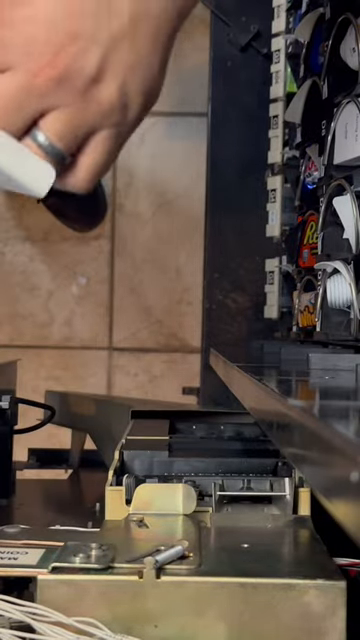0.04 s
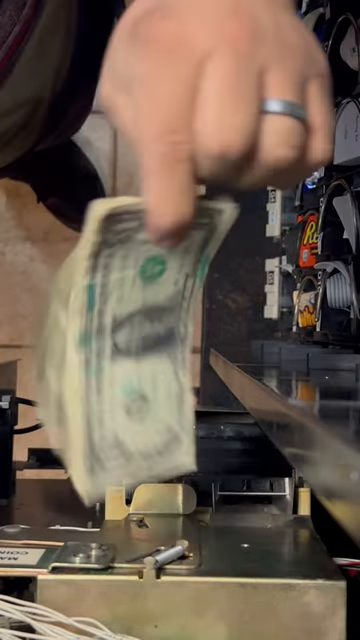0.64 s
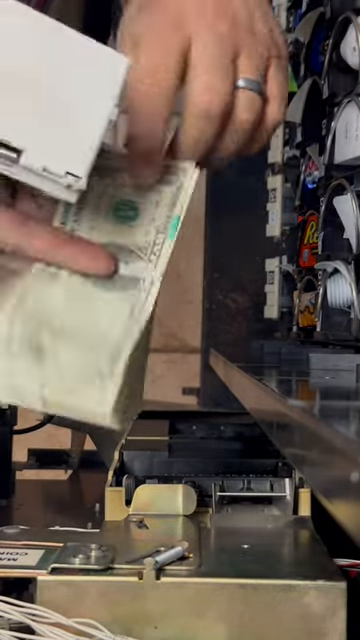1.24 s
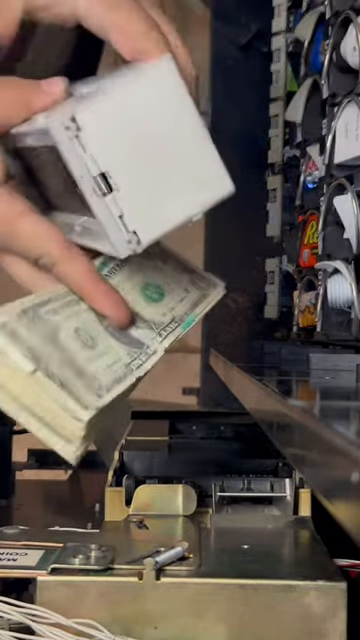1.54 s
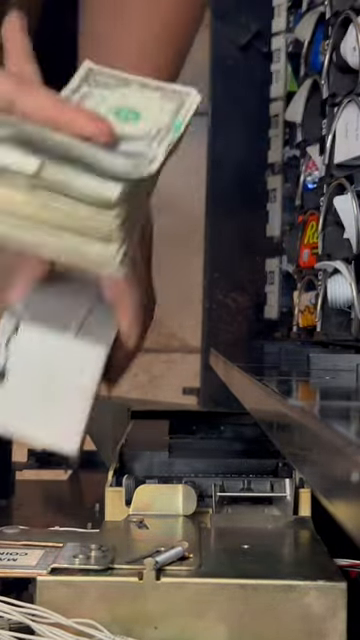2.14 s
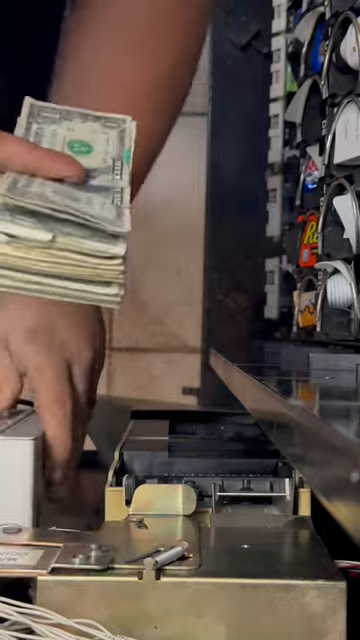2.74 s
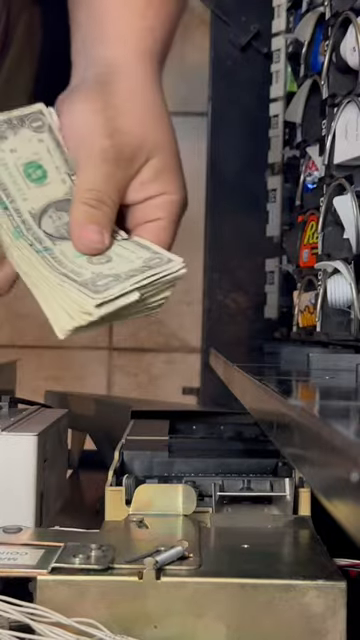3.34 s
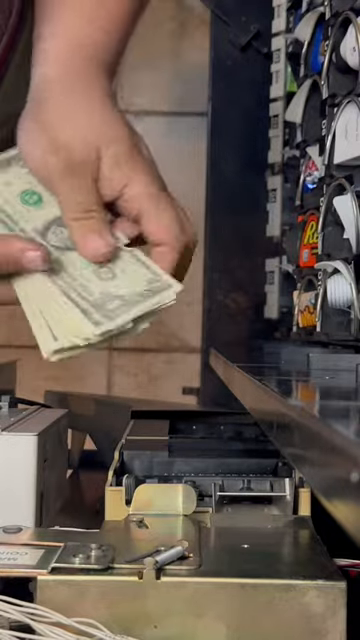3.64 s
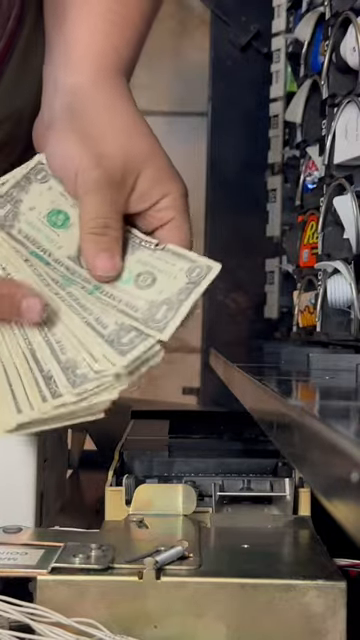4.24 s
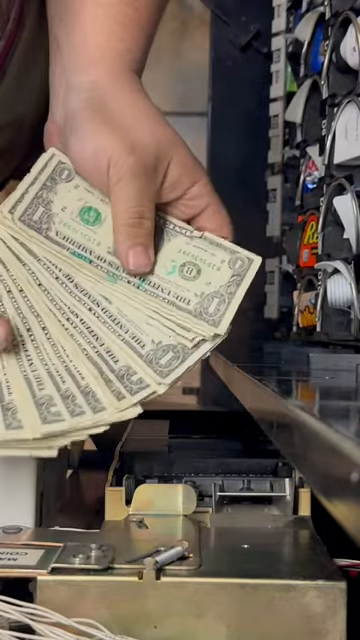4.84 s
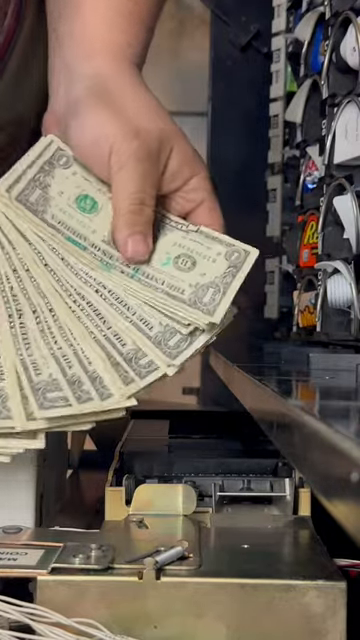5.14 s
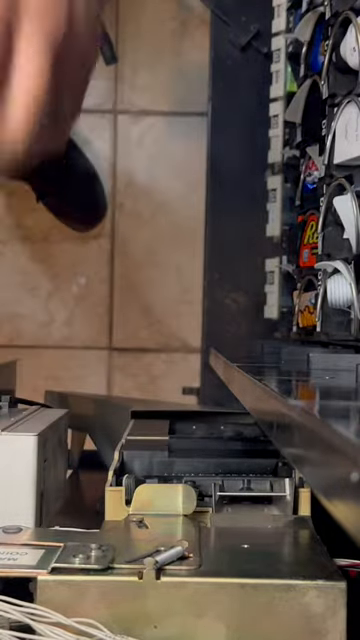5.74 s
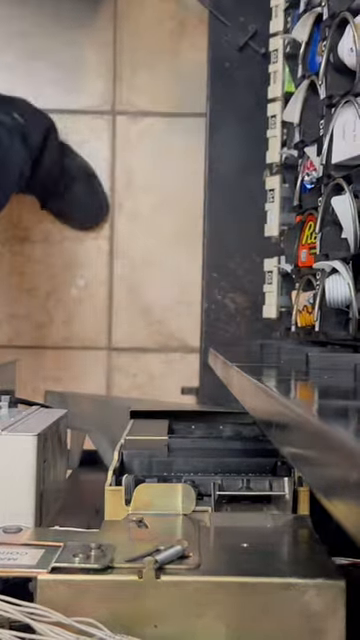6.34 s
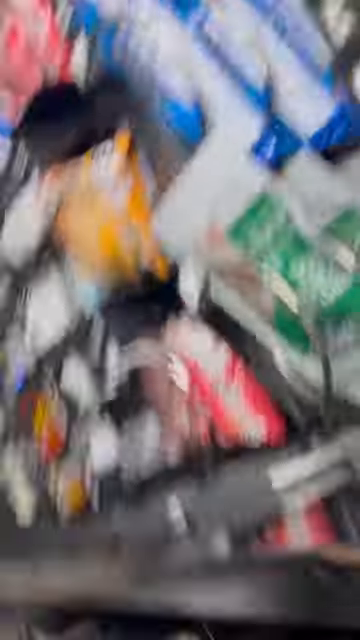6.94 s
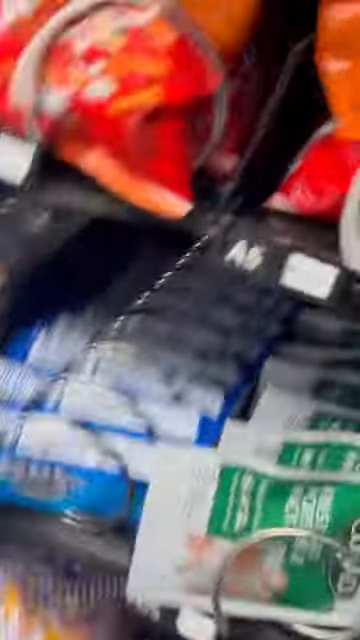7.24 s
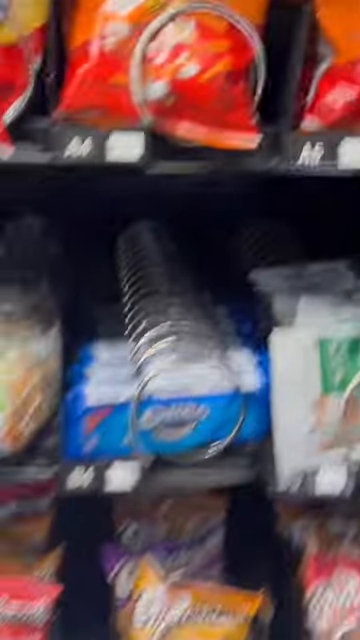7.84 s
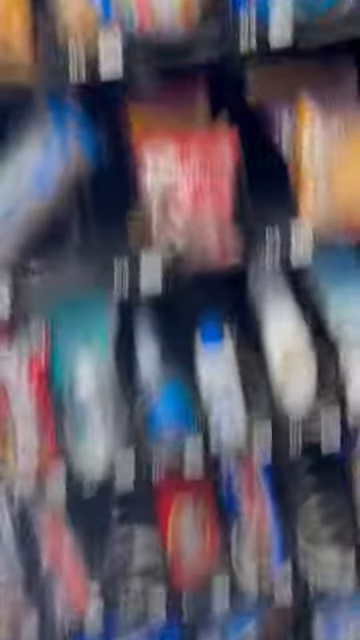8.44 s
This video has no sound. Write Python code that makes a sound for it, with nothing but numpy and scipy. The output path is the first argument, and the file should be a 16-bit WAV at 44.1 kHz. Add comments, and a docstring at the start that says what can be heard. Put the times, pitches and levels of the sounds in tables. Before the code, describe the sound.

Sharp plastic snaps open a cash box close to the microphone, followed by a faint rustle of bills and a few light taps. The box scrapes and clunks into place inside a steel door, leaving a low ring. Bills fan out softly and close with a swish. A shoe scuffs, cloth brushes by, and the door swings with a rumbling, scratchy grind that ends in short scrapes. A vending machine hums throughout in the small room.

```python
"""A vending machine hums in a small tiled room. A plastic cash box squeaks and snaps open, and bills
rub and crackle as they are drawn out. The lid is tapped shut, then the box slides and bumps inside the
steel door, which rings on. The bills are fanned and close with a swish. A footstep thumps and scuffs,
cloth brushes past, and the heavy door swings: its panel rumbles while its edge grinds and scratches,
with a few sharp ticks. Last, the door slows in a stutter of short scrapes and comes to rest."""
import sys
import numpy as np
from scipy import signal
from scipy.fft import rfft, irfft, next_fast_len
from scipy.io import wavfile
from scipy.ndimage import uniform_filter1d, map_coordinates

SR = 44100
rng = np.random.default_rng(int(sys.argv[2]) if len(sys.argv) > 2 else 0)


def generate_wav(signal):
    """Clip the signal to [-1, 1] and save it as 16-bit WAV at the path in sys.argv[1]."""
    frames = np.transpose(np.atleast_2d(signal))
    scaled = np.clip(frames, -1, 1) * 32767
    pcm = np.round(scaled).astype(np.int16)
    wavfile.write(sys.argv[1], SR, pcm)


N = 383664
RIGHT_DELAY_S = 19 / SR
LOW_CUT_HZ, HIGH_CUT_HZ = 45, 15900

# Levels are set before any later gain. A fade_s is the time to fall by 60 dB.
# A TONE table says how strong a sound is from low to high pitch.

# the compressor's hum: pitch_hz, level_db, waver_share
HUM_NOTES = [(51.7, -58.5, 0.78), (122.7, -68, 0.43), (259.7, -62, 0.2), (356.6, -69, 0.4), (1460, -73, .4)]
# air rushing from the cooling fan: pitch_hz, level_db
AIR_TONE = [(25, -29), (55, 2), (85, -5), (140, -10.5), (250, -9), (330, -16.5), (490, -3), (660, -20),
            (850, -16.5), (1700, -30), (2200, -31), (3700, -39), (7000, -43.5), (10500, -35), (15500, -41)]

# hits: start_s, level_db, bass_db, treble_db, contact_s, favoured_pitch_hz, boost_db
LID_SNAPS = [(.055, -42.5, 4, -19.5, 0.0035, 1650, 9), (.080, -35, -13.5, -16, 0.008, 830, 15),
             (.180, -29, -4, -3.5, 0.002, 730, 12.5), (.2255, -31, -0.5, -11, 0.0022, 474, 7),
             (.243, -27, -16, 9, 0.0081, 3350, 12), (.3092, -14.5, 0.5, 11.5, 0.00085, 740, 13),
             (.3222, -19, -5.5, -0.5, 0.0032, 2900, 2.5), (.3563, -11, 1.5, 3.5, 0.0019, 2220, 3)]  # the lid's catch snaps
BOX_TAPS = [(1.775, -26.5, 7, 4, 0.0018, 1470, 5.3), (1.894, -36.5, 10, -8, 0.0025, 600, 4.5),
            (1.980, -37.5, 4.5, -3, 0.0015, 590, 15), (2.423, -31.5, 2, 17, 0.0014, 1130, 13),
            (3.059, -41.5, 5, -3, 0.0057, 694, 2.9), (3.156, -41.5, -5, 4, 0.0027, 740, 14),
            (3.266, -43, 14, -20, 0.0078, 710, 3.5), (3.357, -39, 20, -10, 0.0089, 3300, 9.1)]  # light taps as the box is handled and rocks
DOOR_KNOCKS = [(2.478, -30, -23, -7, 0.004, 800, 3.4), (2.4902, -15.5, 0, -5.5, 0.0023, 1460, 10),
               (2.4966, -15, 4.5, -7.5, 0.0037, 773, 9.9), (2.515, -26, -12, -4, 0.0057, 1500, 3.2),
               (2.608, -34, -13, -5, 0.0023, 1900, 4), (2.6628, -13, 13, -12, 0.0034, 880, 10.5),
               (2.668, -13, 12.5, -4.5, 0.0016, 1090, 9.5), (2.8407, -11.5, 9.5, -8, 0.0023, 1180, 3.6),
               (2.855, -18.5, 13, -7, 0.0033, 1320, 3.1)]  # the box bumps the door
# the notes each thing rings with when hit: pitch_hz, level_db, fade_s
LID_NOTES = [(429, -6, 0.14), (495, 3, 0.0524), (846, -5.5, 0.08), (1357, -2, 0.1376), (1760, -11, 0.0793),
             (2170, -7, 0.11), (2706, -8, 0.034), (3020, -3, 0.038), (3350, -3, 0.08), (4000, -6.5, 0.083),
             (8520, -16, 0.0504)]
BOX_NOTES = [(454, -3, 0.33), (608, -1.5, 0.047), (807, 3.5, 0.04), (1394, 0, 0.047), (1540, -9, 0.065),
             (1900, -6, 0.11), (2990, -8, 0.022)]
DOOR_NOTES = [(349, -4.5, 0.28), (470, -1.5, 0.46), (633, -4, 0.13), (794, 7, 0.05), (868, 7.5, 0.047),
              (1085, 5, 0.034), (1180, 6, 0.06), (1338, 6, 0.06), (1600, -11, 0.13), (2180, -4.5, 0.1),
              (2460, -1, 0.1), (3316, -5, 0.078)]
# the crack of their many crowded higher notes: pitch_hz, level_db
LID_CRACK_TONE = [(60, -22), (200, -0.5), (450, 6.5), (1000, 4.5), (2700, 0), (5000, -7), (9500, -8),
                  (11500, -10.5), (15500, -8.5)]
BOX_CRACK_TONE = [(60, -61), (300, 1), (600, 18), (1100, 17), (1600, 20), (3700, -0.5), (6500, -4),
                  (9500, -33), (15500, -33)]
DOOR_CRACK_TONE = [(60, -26), (230, -26.5), (400, 0.5), (1300, 2), (2500, -5.5), (4000, -4.5), (9500, -5.5),
                   (11500, -9), (15500, -10.5)]

# the lid slides ever harder against its catch, then comes free: time_s, level_db
LID_SLIDE_CURVE = [(.06, -55.5), (.22, -39), (.4, -37.5), (.48, -54)]
# plastic sliding, bright at the lid and hollow along the door: pitch_hz, level_db
LID_SLIDE_TONE = [(150, -11), (400, -3), (600, 15.5), (880, 7.5), (1150, -12), (2500, -0.5),
                  (4000, -5.5), (10000, -5.5), (15500, -14)]
BOX_SLIDE_TONE = [(120, 2), (195, 9.5), (260, -10), (380, 4), (700, 0.5), (1200, -8), (2500, -18),
                  (5000, -27), (10000, -33), (15500, -50)]
# the plastic squeaks as the lid is worked loose: start_s, length_s, level_db, pitch_hz
LID_SQUEAKS = [(0.07, 0.022, -48, 3400), (.14, 0.028, -34, 540), (0.184, 0.022, -39.5, 880),
               (0.223, 0.035, -36, 3400)]
# dull thumps of the box, the door panel and a footstep: start_s, peak_db, pitch_hz, fade_s
DULL_THUMPS = [(0.228, -21.5, 467, 0.087), (0.357, -23, 445, 0.015), (2.495, -16, 763, 0.058),
               (2.525, -21, 127, 0.15), (2.553, -17, 139, 0.11), (2.62, -23, 158, 0.076),
               (2.667, -23, 401, 0.25), (2.844, -19.5, 342, 0.058), (6.407, -31, 54, 0.11),
               (6.439, -34, 72, 0.062), (7.332, -22, 130, 0.033), (7.332, -19, 294, 0.047)]

# rubbing strokes: start_s, length_s, level_db
BILL_STROKES = [(.48, 0.48, -56), (.85, 0.24, -55), (1.2, 0.029, -53), (1.5, 0.4, -61.5), (3.15, 0.17, -58),
                (3.47, 0.26, -53.5), (3.76, 0.58, -64), (5.25, 0.25, -61), (5.55, 1, -57.5)]  # bills are drawn out, squared and gathered
BOX_STROKES = [(2.42, 0.37, -33), (2.83, 0.049, -31.5)]  # the box is pushed along the door
THUMB_STROKES = [(3.5, 0.36, -66), (4.6, 0.57, -69)]  # a thumb fans the bills
SWISH_STROKES = [(5.21, 0.16, -52.5), (6.6, 0.43, -39), (8.26, 0.32, -50)]  # the bills close up, cloth brushes past
SHOE_STROKES = [(6.39, 0.047, -44.5)]  # a sole on the tiles
SETTLING_STROKES = [(7.94, 0.056, -46.5), (8.085, 0.02, -44.5), (8.215, 0.035, -54)]  # the door comes to rest
# notes that rubbing keeps ringing: pitch_hz, width_hz, level_db
LID_RUB_NOTES = [(534, 42, -5), (824, 62, -2), (1860, 140, -7), (2300, 45, -16), (4360, 140, -13)]
PAPER_RUB_NOTES = [(1540, 210, -2), (2016, 89, -2), (2440, 89, -4.5)]
SHOE_RUB_NOTES = [(4700, 4500, 0)]
EDGE_SCRATCH_NOTES = [(2720, 690, -4), (4670, 910, -3), (7300, 2500, -6.5)]
EDGE_RUB_NOTES = [(1620, 430, 10), (2440, 370, -13)]

# small clicks: start_s, level_db, pitch_hz, ring_against_click_db, fade_s
CREASE_POPS = [(.92, -49.5, 3600, -12, 0.1), (.978, -55, 4000, -14, .06), (1.018, -52.5, 3200, 1, .04),
               (1.036, -55, 5500, -3, 0.034), (1.062, -57, 4800, -5, 0.027), (1.249, -55.5, 4300, -8, .04),
               (3.85, -54.5, 2890, -5, 0.13)]  # creases pop as the bills bend
SMALL_TICKS = [(2.366, -47.5, 890, -4, 0.094), (5.684, -54, 2570, 2, 0.06), (5.728, -50, 4000, -26, 0.24),
               (5.876, -51.5, 2390, 3, 0.18), (5.97, -55, 12100, -8, 0.033), (6.206, -47, 706, 9, 0.14),
               (6.581, -35, 4800, -1, 0.087), (7.1456, -33, 4400, 17, 0.18), (7.311, -35, 4520, 10, 0.054),
               (8.157, -37.5, 4350, -9, 0.02), (8.1932, -36, 2300, -11, 0.011),
               (8.268, -44, 1300, 1, 0.013)]  # small sharp ticks and a light footstep
EDGE_CATCHES = [(6.888, -35, 900, 11, .1), (7.056, -29, 740, -18, 0.2), (7.213, -36, 1150, 4, .06),
                (7.245, -31, 525, 0, 0.12), (7.275, -29, 700, -5, 0.11), (7.323, -29, 486, 15, 0.14),
                (7.335, -31, 1150, 2, 0.095)]  # the door's edge catches on rough spots
# the tone of those three kinds of click: pitch_hz, level_db
POP_TONE = [(300, -6), (2000, 11), (6000, 8), (10000, 6), (15000, -12)]
TICK_TONE = [(300, 25), (2000, 14.5), (7000, 13), (10000, 10), (15000, -34)]
CATCH_TONE = [(120, -4), (300, 1), (700, 4), (1400, 1), (2500, -10), (5000, -28), (10000, -28),
              (15000, -45)]
# sliding paper, fine crackle and brushing cloth: pitch_hz, level_db
PAPER_TONE = [(300, 18.5), (900, 13.5), (1600, 8), (2300, 7.5), (4000, -2), (7000, -1.5), (9300, -0.5),
              (15500, -6)]
CRACKLE_TONE = [(300, -3), (1500, 13), (5000, 7), (10000, -3), (15500, -34)]
CLOTH_TONE = [(500, -10), (2000, 1), (5000, 1.5), (8000, 3), (10000, 5), (12000, -3), (15500, -8)]

# how hard the swinging door shakes, drags and hisses: time_s, level_db
SHAKE_CURVE = [(6.52, -56), (6.61, -46), (7.11, -43), (7.41, -25.5), (7.68, -35.5), (8.21, -34.5),
               (8.27, -44.5), (8.5, -44), (8.7, -58.5)]
DRAG_CURVE = [(6.5, -54.5), (6.58, -42.5), (6.74, -35.5), (7.19, -31.5), (7.27, -25), (7.36, -25.5),
              (7.51, -34), (8.05, -43), (8.7, -50)]
HISS_CURVE = [(6.5, -51.5), (6.65, -43), (6.9, -38), (7.13, -40), (7.32, -31.5), (7.43, -38.5),
              (7.52, -47.5), (8.2, -52), (8.4, -44.5), (8.7, -54.5)]
# the panel's boom and drone, and its edge's grind, hiss and scrape: pitch_hz, level_db
BOOM_TONE = [(25, 6), (45, -10), (63, 21.5), (78, 8.5), (110, -18), (200, -56)]
DRONE_TONE = [(60, -53), (92, 2.5), (120, -3), (145, -3), (165, -13), (195, -8.5), (245, -6.5), (330, -6.5),
              (600, -61)]
GRIND_TONE = [(120, -3.5), (165, 1.5), (190, 9), (235, -1.5), (280, -11), (335, 4.5), (400, -7.5),
              (500, -0.5), (630, -5), (800, -1.5), (1000, -10), (1300, -7.5), (1750, -17.5), (2500, -19.5),
              (4000, -48)]
HISS_TONE = [(1500, 6), (2600, 1), (3300, 0), (4500, -1.5), (7500, -4.5), (9500, -7), (11500, -14),
             (15500, -32)]
SCRAPE_TONE = [(300, -6), (1500, 12.5), (3000, 0.5), (6000, 2), (9500, 3), (12000, -7), (15500, -20)]

# how long the room echoes: pitch_hz, fade_s
ECHO_FADES = [(100, 0.38), (400, 0.39), (1500, 0.23), (5000, 0.26), (10000, 0.15), (16000, 0.088)]
# the brightness of the echo: pitch_hz, level_db
ECHO_TONE = [(200, -2.5), (3000, 3.5), (8000, 7), (15000, 9)]
# how alike a noise is on the left and right: pitch_hz, likeness_share
STEREO_LIKENESS = [(60, 0.98), (130, 0.68), (290, 0.45), (640, 0.64), (1400, 0.13), (7000, 0.2),
                   (10000, 0.03)]
# how much louder a noise is on the left: pitch_hz, left_minus_right_db
LEFT_LEAD = [(80, -0.5), (400, 4), (1300, 1.5), (2400, 1.5), (4400, 6), (7000, 8), (10000, -1)]
# how wide the whole scene sounds: pitch_hz, side_gain_db
STEREO_WIDTH = [(60, 4), (200, -1.5), (500, -1), (8500, 1.5), (10000, -3), (12500, -47), (14000, -1)]


def amp(db):
    """Turns decibels into a number to multiply by."""
    return 10 ** (np.asarray(db) / 20)


def unit_power(x):
    """Scales a signal to an average power of 1."""
    return x / np.sqrt(np.mean(x ** 2) + 1e-20)


def unit_energy(x):
    """Scales a signal to a total energy of 1 per channel, on average."""
    return unit_power(x) / np.sqrt(x.shape[-1])


def at_pitch(points, hz):
    """Looks up a table's value at any pitch, sliding between its rows."""
    pitches, values = np.transpose(points)
    return np.interp(np.log(hz + 1), np.log(pitches), values)


def follow(curve):
    """Gain that follows a level curve and is silent outside it."""
    times, db = np.transpose(curve)
    return amp(np.interp(np.arange(N) / SR, times, db, left=-200, right=-200))


def strokes(rows, rise_s, fall_db_per_s):
    """Gain of rubbing strokes: each swells, then dies away once its length is up."""
    t = np.arange(N) / SR
    gain = 0
    for start, length, db in rows:
        swell = np.clip((t - start) / rise_s, 0, 1)
        gain = gain + swell * amp(db - fall_db_per_s * np.maximum(t - start - length, 0))
    return gain


def add(mix, start_s, sound):
    """Mixes a stereo sound in at its start time."""
    part = mix[:, round(start_s * SR):][:, :sound.shape[1]]
    part += sound[:, :part.shape[1]]


def drift(per_s):
    """A smooth random wobble that heads for a new value per_s times a second."""
    targets = rng.standard_normal(4096)
    return unit_power(map_coordinates(targets, [np.arange(N) / SR * per_s], order=2, mode="wrap"))


def colour(x, tone):
    """Filters a sound to the given tone, with no ringing ahead of a hit."""
    log_gain = np.log(amp(at_pitch(tone, abs(np.fft.fftfreq(2048, 1 / SR)))))
    response = np.fft.ifft(np.exp(np.conj(signal.hilbert(log_gain)))).real
    return signal.oaconvolve(x, response[None], axes=1)[:, :x.shape[1]]


def white_noise(size):
    """Plain hiss, mostly the same on both sides."""
    return rng.standard_normal(size) + 0.5 * rng.standard_normal((2, size))


def noise(tone, grain_db=0, ripple_db=6, ripple_hz=22, delay_s=RIGHT_DELAY_S):
    """Stereo noise: tiny uneven slips make it grainy, and standing waves ripple its tone."""
    size = next_fast_len(N, True)
    hz = np.fft.rfftfreq(size, 1 / SR)
    slips = np.repeat(np.clip(rng.standard_normal(size // 64 + 1), -3, 3), 64)[:size]
    left, other = rfft(rng.standard_normal((2, size)) * amp(grain_db * slips))
    alike = np.clip(at_pitch(STEREO_LIKENESS, hz), -1, 1)
    right = alike * left + np.sqrt(1 - alike ** 2) * other
    right = right * amp(-at_pitch(LEFT_LEAD, hz)) * np.exp(-2j * np.pi * hz * delay_s)
    ripple = map_coordinates(rng.standard_normal(4096), [hz / ripple_hz], order=1, mode="wrap")
    gain = amp(at_pitch(tone, hz) + ripple_db * ripple * np.minimum(hz / 1000, 1))
    return unit_power(irfft(np.array([left, right]) * gain, size)[:, :N])


def rubbed(notes, waver, waver_hz):
    """Rubbing keeps notes ringing; their pitches shift together as the grip changes."""
    friction = white_noise(N)
    ringing = 0
    for hz, width_hz, db in notes:
        band = signal.lfilter(*signal.iirpeak(hz, hz / width_hz, SR), friction)
        ringing = ringing + amp(db) * unit_power(band)
    position = np.cumsum(1 + waver * drift(waver_hz))
    return unit_power(np.array([np.interp(position, np.arange(N), side) for side in ringing]))


def random_kicks(per_s, spread_db):
    """Tiny pushes at random times, mostly small and a few large."""
    return (rng.random(N) < per_s / SR) * amp(spread_db * np.minimum(rng.exponential(1, N), 2.5))


def from_left(x, far_db):
    """A sound from the left reaches the right side later; far_db weakens it there above the bass."""
    late = np.pad(x[1], (round(RIGHT_DELAY_S * SR), 0))[None, :x.shape[1]]
    shade = [(100, 0.014), (400, far_db), (1000, far_db), (2400, far_db / 2), (6500, far_db),
             (9500, 0.04)]
    return np.array([x[0], colour(late, shade)[0]])


def room(x, echo_db, first_s=0.0013, build_s=0.0022, echoes_per_s=4000):
    """Echoes off the cabinet and tiles build up quickly; the highest pitches die first."""
    size = SR // 2
    echoes = rng.choice([-1., 1.], (2, size)) * (rng.random((2, size)) < echoes_per_s / SR)
    hz, t, bands = signal.stft(echoes, SR, nperseg=256)
    bands = bands * amp(-60 * t / at_pitch(ECHO_FADES, hz)[:, None] + at_pitch(ECHO_TONE, hz)[:, None])
    tail = signal.istft(bands, SR, nperseg=256)[1][:, :size]
    tail = unit_energy(tail * np.clip((np.arange(size) / SR - first_s) / build_s, 0, 1))
    return x + amp(echo_db) * signal.oaconvolve(x, tail, axes=1)[:, :N]


def machine_hum(air_db=-49.5, waver_hz=16):
    """The compressor's notes waver over the rush of air from the cooling fan."""
    t = np.arange(N) / SR - np.array([[0], [RIGHT_DELAY_S]])
    out = amp(air_db) * noise(AIR_TONE, ripple_db=4.5, ripple_hz=28)
    for hz, db, waver in HUM_NOTES:
        angle = 2 * np.pi * (hz * t + rng.random())
        note = (1 + waver * drift(waver_hz)) * np.cos(angle) + waver * drift(waver_hz) * np.sin(angle)
        out += amp(db) * unit_power(note)
    return out


def fan_whine(pitch_hz=480.7, level_db=-51, wander_hz=3.5, flutter=0.32):
    """The blades make one clean note that wanders with the fan's speed and flutters a little."""
    turns = np.cumsum(pitch_hz + wander_hz * drift(5)) / SR - pitch_hz * np.array([[0], [RIGHT_DELAY_S]])
    return amp(level_db) * unit_power((1 + flutter * drift(22)) * np.cos(2 * np.pi * turns))


def contact_force(t, contact_s):
    """One touch is a quick burst of tiny impacts, about equally strong at all pitches."""
    age = t / max(contact_s, 1e-4)
    burst = white_noise(len(t)) * age * np.exp(-age)
    flat = irfft(np.exp(1j * np.angle(rfft(burst))), len(t))
    return unit_energy(flat * np.exp(-age / 10))


def hits(rows, notes, crack_tone, ring_db, far_db, sharpness=7):
    """Each hit on the lid, box or door makes a crack and sets that thing's own notes ringing."""
    out, t = np.zeros((2, N)), np.arange(16384) / SR
    for start, db, bass_db, treble_db, contact_s, pitch_hz, boost_db in rows:
        force = contact_force(t, contact_s)
        shifts = 1 + 0.0098 * rng.standard_normal(len(notes))  # the grip shifts the notes
        ring = sum(amp(note_db) * unit_energy(np.cos(2 * np.pi * hz * shift * t) * amp(-60 * t / fade_s))
                   for (hz, note_db, fade_s), shift in zip(notes, shifts))
        ringing = unit_energy(signal.fftconvolve(force, ring[None], axes=1)[:, :len(t)])
        sound = unit_energy(colour(force, crack_tone)) + amp(ring_db) * ringing
        # the spot that is hit favours the notes near one pitch
        favoured = signal.lfilter(*signal.iirpeak(pitch_hz, sharpness, SR), sound)
        sound = sound + (amp(boost_db) - 1) * favoured
        sound = colour(sound, [(350, bass_db), (900, 0.012), (2500, 0.00121), (7000, treble_db)])
        add(out, start, amp(db) * unit_energy(sound) * np.sqrt(SR / 100))  # as if packed into 10 ms
    return from_left(out, far_db)


def lid_slide(ring_db=-4, uneven_db=2):
    """The plastic lid sticks and slips against its catch, which makes it ring."""
    scrape = noise(LID_SLIDE_TONE, grain_db=3)
    ringing = from_left(rubbed(LID_RUB_NOTES, waver=0.00765, waver_hz=18), far_db=0)
    return follow(LID_SLIDE_CURVE) * (scrape + amp(ring_db) * ringing) * amp(uneven_db * drift(70))


def lid_squeaks(width_share=0.019):
    """Each squeak is one narrow note kept going by rubbing."""
    out = 0
    for start, length, db, hz in LID_SQUEAKS:
        gain = strokes([(start, length, db)], rise_s=0.0084, fall_db_per_s=599)
        out = out + gain * rubbed([(hz, width_share * hz, 0)], waver=0.018, waver_hz=40)
    return from_left(out, far_db=-5.5)


def thumps():
    """Each dull thump of the box, the door panel or a footstep swells over one cycle, then dies away."""
    out, t = np.zeros((2, N)), np.arange(8192) / SR
    for start, db, hz, fade_s in DULL_THUMPS:
        wave = np.sin(2 * np.pi * hz * t) * np.minimum(t * hz, 1) * amp(-60 * t / fade_s)
        add(out, start, amp(db) * np.array([wave, wave]) / abs(wave).max())
    return from_left(out, far_db=-3.5)


def crackle(per_s, spread_db, fade_s=0.03):
    """Scattered little snaps, each a short puff of noise."""
    t = np.arange(2048) / SR
    kicks = random_kicks(per_s, spread_db)
    puff = rng.standard_normal((2, len(t))) * amp(-60 * t / fade_s)
    snaps = signal.oaconvolve(kicks[None], puff, axes=1)[:, :N]
    return unit_power(colour(snaps, CRACKLE_TONE))


def bills(flutter_db=2):
    """Worn paper slides in small slips and its creases crackle; fanned sheets rub with a hollow tone."""
    creases = amp(-11) * crackle(per_s=110, spread_db=3, fade_s=0.025)
    paper = noise(PAPER_TONE, grain_db=-1, ripple_db=4.5)
    sliding = strokes(BILL_STROKES, rise_s=0.023, fall_db_per_s=102) * (paper + creases)
    hollow = rubbed(PAPER_RUB_NOTES, waver=0.022, waver_hz=5.5)
    fanning = strokes(THUMB_STROKES, rise_s=0.072, fall_db_per_s=68) * hollow
    pops = clicks(CREASE_POPS, POP_TONE, rise_s=0.002, width_share=0.56)
    return amp(flutter_db * drift(25)) * (sliding + fanning) + pops


def clicks(rows, tone, rise_s, width_share):
    """Each dry click is a burst of noise that rings one note; a wider note is less clear in pitch."""
    out, t = np.zeros((2, N)), np.arange(8192) / SR
    for start, db, hz, ring_db, fade_s in rows:
        click = white_noise(len(t)) * np.minimum(t / rise_s, 1) * amp(-60 * t / fade_s)
        ring = np.sin(2 * np.pi * hz * t) * np.exp(-np.pi * width_share * hz * t)
        ringing = unit_energy(signal.fftconvolve(click, ring[None], axes=1)[:, :len(t)])
        sound = unit_energy(colour(click, tone)) + amp(ring_db) * ringing
        add(out, start, amp(db) * unit_energy(sound) * np.sqrt(SR / 100))  # as if packed into 10 ms
    return out


def box_slide(uneven_db=2):
    """The box sticks and slips along the door with a hollow scrape."""
    gain = strokes(BOX_STROKES, rise_s=0.043, fall_db_per_s=77)
    return gain * noise(BOX_SLIDE_TONE) * amp(uneven_db * drift(70))


def door_rumble(tone, swing_db, knock_db, swell_s, fade_s):
    """The steel panel stores each knock's energy and lets it leak away; later it shakes as it swings."""
    energy = 0
    for start, db, *_ in DOOR_KNOCKS:
        age = np.maximum(np.arange(N) / SR - start, 0)
        energy = energy + (np.minimum(age / swell_s, 1) * amp(db + knock_db - 60 * age / fade_s)) ** 2
    rumble = noise(tone, delay_s=0)
    power = abs(uniform_filter1d((rumble ** 2).mean(0), 3000))
    steady = rumble / np.sqrt(power + 0.12)  # smooths out the noise's own swells
    return (amp(swing_db) * follow(SHAKE_CURVE) + np.sqrt(energy)) * steady


def swishes():
    """The closing bills and passing cloth brush with a bright, finely grained hiss."""
    return strokes(SWISH_STROKES, rise_s=0.13, fall_db_per_s=230) * noise(CLOTH_TONE, grain_db=1.5)


def shoe_scuff():
    """A sole scrapes briefly over the tiles."""
    gain = strokes(SHOE_STROKES, rise_s=0.075, fall_db_per_s=180)
    return gain * rubbed(SHOE_RUB_NOTES, waver=0.05, waver_hz=20)


def door_drag(grind_db=1.94, hiss_db=-2):
    """The dragging edge grinds, hisses and crackles, all trembling together."""
    grind = follow(DRAG_CURVE) * noise(GRIND_TONE, grain_db=1.5, ripple_db=2, delay_s=-RIGHT_DELAY_S)
    grit = amp(-7) * crackle(per_s=110, spread_db=5)
    hiss = follow(HISS_CURVE) * (noise(HISS_TONE, grain_db=1.5) + grit)
    tremble = amp(drift(110) + 0.8 * drift(22))
    return (amp(grind_db) * grind + amp(hiss_db) * hiss) * tremble


def door_judder(level_db=-4, low_hz=300, high_hz=1500, ring_cycles=6, fall_db_per_octave=3):
    """The edge sticks and slips; each little slip briefly rings one of the panel's many notes."""
    t, out = np.arange(2048) / SR, 0
    for hz in np.geomspace(low_hz, high_hz, 16):
        slips = random_kicks(per_s=28, spread_db=2.5)
        wave = np.sin(2 * np.pi * hz * t + rng.uniform(-1.1, 1.0, (2, 1)))
        ring = unit_energy(wave * np.exp(-np.pi * hz * t / ring_cycles))
        gain = amp(-fall_db_per_octave * np.log2(hz / low_hz))
        out = out + gain * signal.oaconvolve(slips[None], ring, axes=1)[:, :N]
    return amp(level_db) * follow(DRAG_CURVE) * unit_power(out)


def door_scratches(level_db=-6.5):
    """Rough spots along the dragging edge give brief scratches that waver in pitch."""
    spots = unit_power(amp(5.5 * np.clip(drift(38), -2, 1.7)))
    scratch = rubbed(EDGE_SCRATCH_NOTES, waver=0.12, waver_hz=22.12)
    return amp(level_db) * follow(HISS_CURVE) * spots * scratch


def door_stutter(start_s=7.596, every_s=0.1137, length_s=0.0096, first_db=-36.5, drop_db=2.5):
    """The slowing edge slips four times at an even pace, each bright scrape weaker than the last."""
    slips = [(start_s + k * every_s, length_s, first_db - k * drop_db) for k in range(4)]
    return strokes(slips, rise_s=0.004, fall_db_per_s=306) * noise(SCRAPE_TONE, grain_db=-1)


def door_settling(uneven_db=2):
    """The edge comes to rest with a few uneven, hollow rubs."""
    gain = strokes(SETTLING_STROKES, rise_s=0.014, fall_db_per_s=260) * amp(uneven_db * drift(80))
    return gain * rubbed(EDGE_RUB_NOTES, waver=0.054, waver_hz=21.96)


def scene():
    """The box, the bills and the door over the machine's hum; hits and small ticks echo in the room."""
    snaps = room(hits(LID_SNAPS, LID_NOTES, LID_CRACK_TONE, ring_db=-3, far_db=-5.5), echo_db=-2.5)
    taps = room(hits(BOX_TAPS, BOX_NOTES, BOX_CRACK_TONE, ring_db=4, far_db=-4.5), echo_db=-2)
    knocks = hits(DOOR_KNOCKS, DOOR_NOTES, DOOR_CRACK_TONE, ring_db=-1.5, far_db=-5.5, sharpness=11.6)
    knocks = room(knocks, echo_db=-4)
    ticks = room(clicks(SMALL_TICKS, TICK_TONE, rise_s=0.00094, width_share=0.14), echo_db=-23)
    boom = door_rumble(BOOM_TONE, swing_db=0, knock_db=-26.5, swell_s=0.22, fade_s=4)
    drone = door_rumble(DRONE_TONE, swing_db=-1, knock_db=-22, swell_s=0.038, fade_s=2)
    door = boom + drone + door_drag() + door_judder()
    door += clicks(EDGE_CATCHES, CATCH_TONE, rise_s=0.0024, width_share=0.16)
    door += door_scratches() + door_stutter() + door_settling()
    box = snaps + lid_slide() + lid_squeaks() + taps + box_slide() + knocks
    handling = thumps() + bills() + ticks + swishes() + shoe_scuff()
    return machine_hum() + fan_whine() + box + handling + door


def record(dry):
    """Cuts the deepest bass, sets the stereo width pitch by pitch, then cuts the highest treble."""
    dry = signal.sosfilt(signal.butter(2, LOW_CUT_HZ, "highpass", fs=SR, output="sos"), dry)
    mid, side = (dry[0] + dry[1]) / 2, (dry[0] - dry[1]) / 2
    size = next_fast_len(N, True)
    width = amp(at_pitch(STEREO_WIDTH, np.fft.rfftfreq(size, 1 / SR)))
    side = irfft(rfft(side, size) * width, size)[:N]
    high_cut = signal.firwin(401, HIGH_CUT_HZ, window=("kaiser", 8), fs=SR)
    return signal.oaconvolve(np.array([mid + side, mid - side]), high_cut[None], "same", axes=1)


dry = scene()
out = record(dry)
generate_wav(out)
```